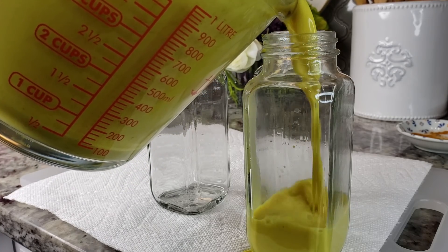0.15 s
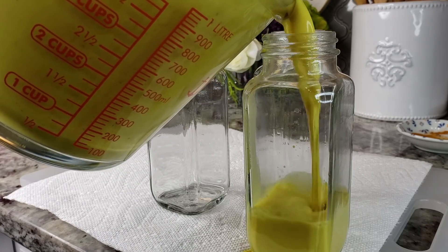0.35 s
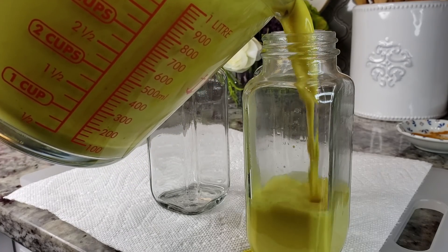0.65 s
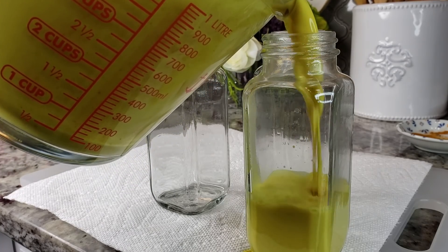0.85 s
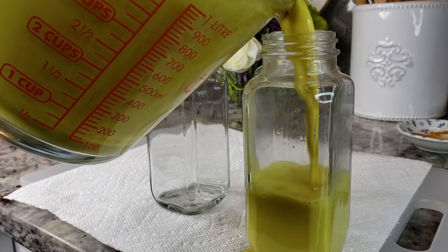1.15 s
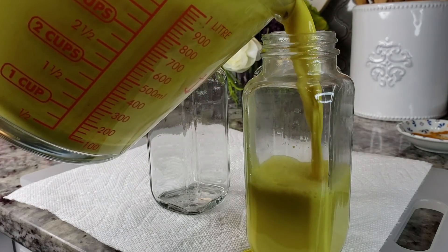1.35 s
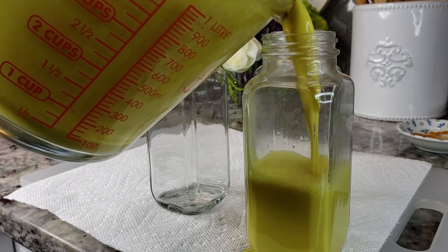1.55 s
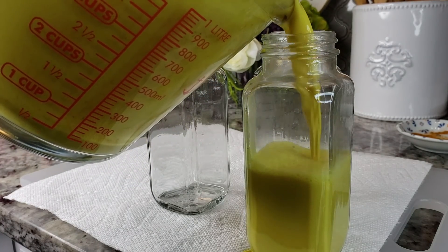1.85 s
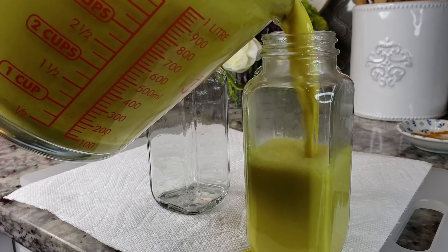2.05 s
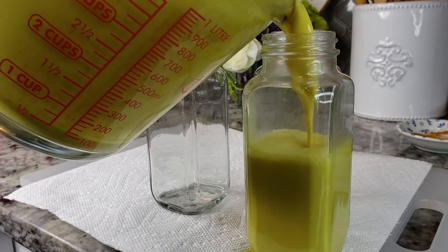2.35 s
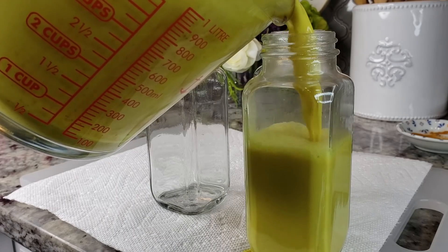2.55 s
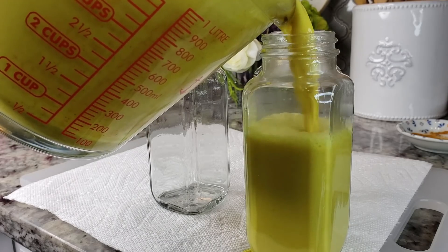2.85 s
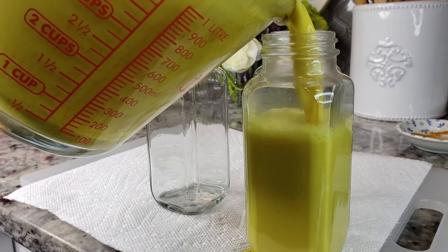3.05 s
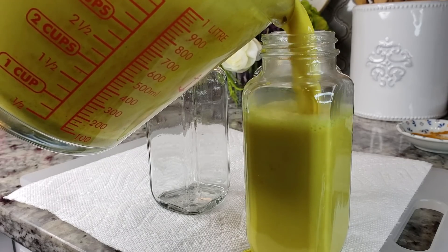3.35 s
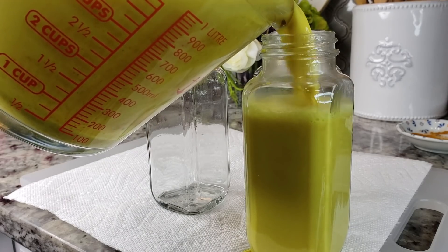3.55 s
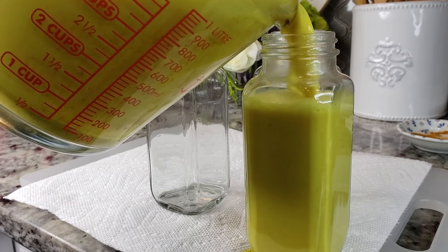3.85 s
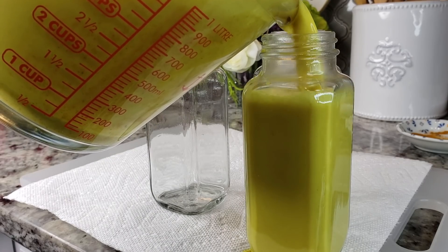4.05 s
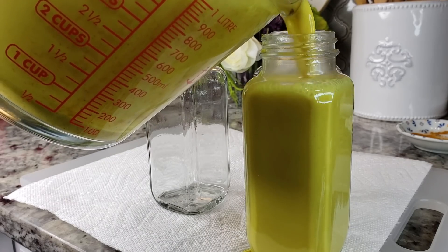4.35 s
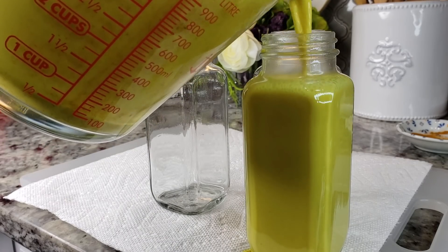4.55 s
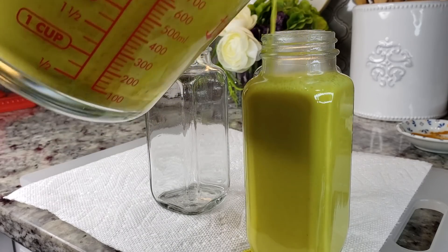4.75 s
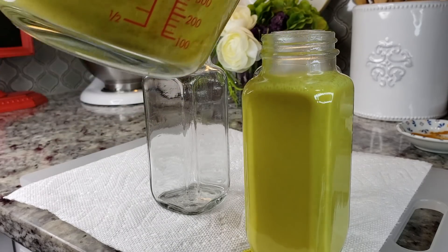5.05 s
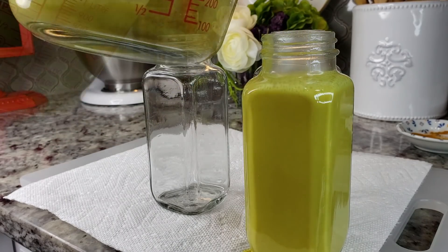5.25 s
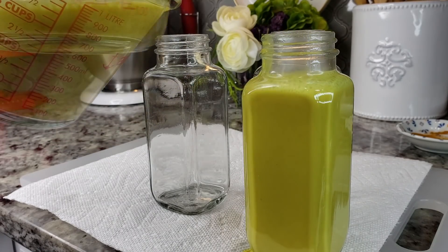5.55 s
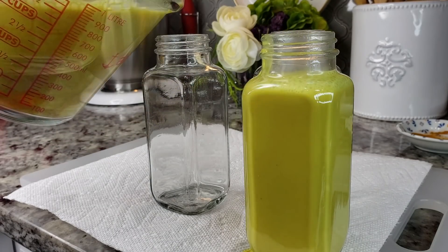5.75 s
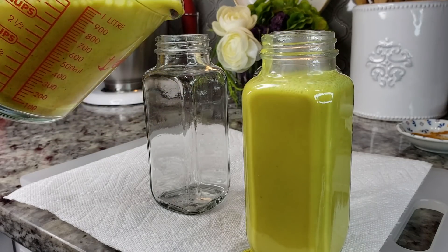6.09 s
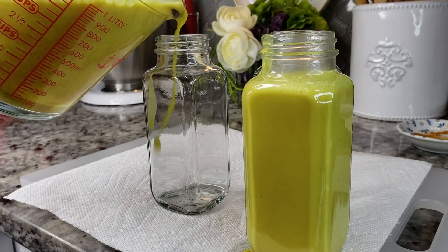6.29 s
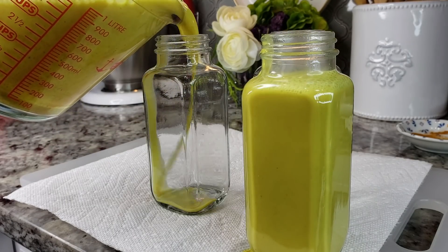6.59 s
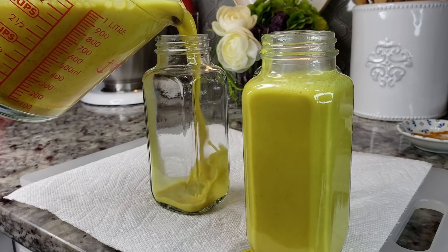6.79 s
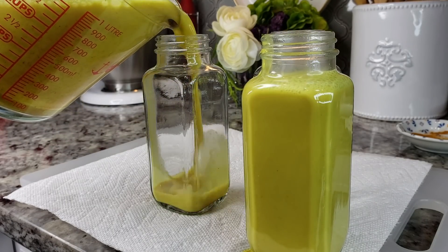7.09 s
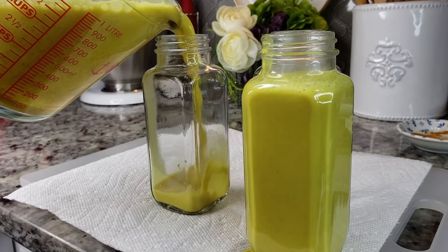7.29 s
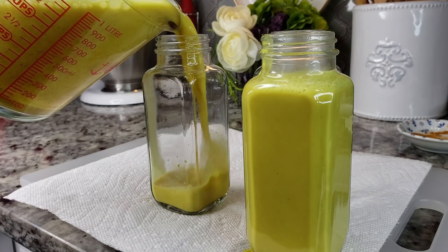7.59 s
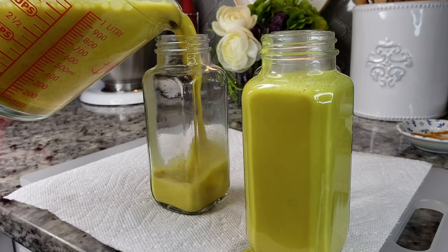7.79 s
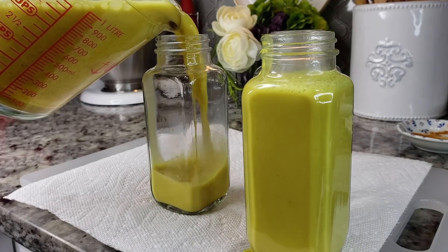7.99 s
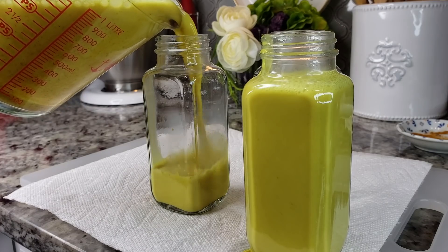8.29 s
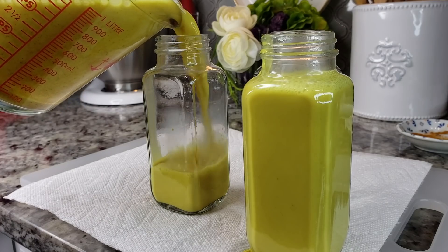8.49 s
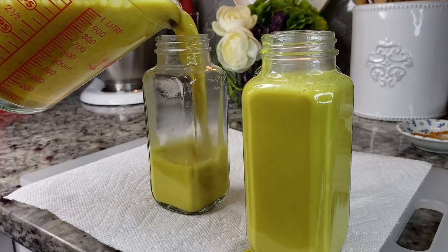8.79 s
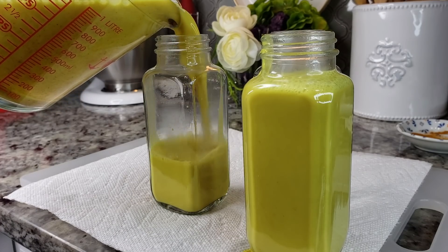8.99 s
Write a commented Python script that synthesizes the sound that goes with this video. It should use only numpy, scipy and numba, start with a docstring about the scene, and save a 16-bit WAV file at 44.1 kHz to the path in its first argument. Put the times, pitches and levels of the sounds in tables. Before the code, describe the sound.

Close kitchen pour: gulping, bubbling liquid rises in tone to the bottle's neck, pauses, then drops ring empty glass and glugging resumes.

```python
"""Over a low kitchen hum, thick juice is poured from a glass jug into a glass bottle until it is nearly full.
Air trapped by the stream gulps and rings the air left in the bottle, whose pitch mostly climbs meanwhile.
Drops crack and bubbles chirp; a wet wash wells into the neck, the pour stops and foam hisses away.
Then drops slap and ring a second, empty bottle, and the stream starts to fill it, gulping again.
Every sound is made from shaped noise, moving resonances and short gliding tones."""
import sys
import numpy as np
from scipy import signal
from scipy.fft import rfft, irfft, next_fast_len
from scipy.io import wavfile
from scipy.ndimage import uniform_filter1d
from numba import njit

SR = 44100
rng = np.random.default_rng(int(sys.argv[2]) if len(sys.argv) > 2 else 0)


def wav_out(sig):
    """Save sig, one row per channel (or a flat mono array), as 16-bit PCM at SR to the path in sys.argv[1]."""
    wavfile.write(sys.argv[1], SR, np.round(np.clip(np.atleast_2d(sig).T, -1, 1) * 32767).astype(np.int16))


N = 402633
TIME = np.arange(N) / SR  # seconds
SWAP_S = 6  # from here on the second bottle is used
COVERED_FILL = 0.074  # effective fill at which the bottle's floor is covered
OPPOSITE = np.array([[1], [-1]])  # left and right with opposite signs


def undb(db):
    """Turn decibels into a gain."""
    return 10 ** (np.asarray(db) / 20)


def unit(x):
    """Scale a sound to an rms of 1."""
    return x / np.sqrt(np.mean(x ** 2) + 1e-30)


def steady(x, count=11025):
    """Even out the slow level over count samples and keep the fine grain."""
    power = np.abs(uniform_filter1d(x ** 2, count))
    return x / np.sqrt(power + 1e-12)


def add(out, s, x):
    """Mix a short sound in at time s."""
    i = max(int(s * SR), 0)
    out[..., i:i + x.shape[-1]] += x[..., :N - i]


def colour(x, points):
    """Filter by a curve of (Hz, dB) points."""
    hz, db = np.transpose(points)
    size = next_fast_len(N)
    f = np.maximum(np.fft.rfftfreq(size, 1 / SR), 1)
    gain = undb(np.interp(np.log(f), np.log(hz), db))
    return irfft(rfft(x, size) * gain, size)[..., :N]


def high_pass(x, hz, order):
    """Keep what lies above a frequency."""
    return signal.sosfilt(signal.butter(order, hz, "high", fs=SR, output="sos"), x)


def low_pass(x, hz):
    """Gently dull what lies above a frequency."""
    return signal.sosfilt(signal.butter(1, hz, fs=SR, output="sos"), x)


def walk(rate):
    """Wander at random, with rate new values a second and an rms of 1."""
    return unit(np.interp(TIME * rate, np.arange(2048), rng.standard_normal(2048)))


@njit
def resonate(x, hz, q):
    """Band-pass filter whose centre may move every sample; a higher q rings longer."""
    y, band, low = np.empty(len(x)), 0., 0.
    for i in range(len(x)):
        g = np.tan(np.pi * min(hz[i] / SR, .45))
        v = (band + g * (x[i] - low)) / (1 + g * (g + 1 / q))
        band = 2 * v - band
        low = low + 2 * g * v
        y[i] = v / q
    return y


def resonate_twice(x, hz, first_q, second_q):
    """Two band-passes in a row give steeper sides."""
    return resonate(resonate(x, hz, float(first_q)), hz, float(second_q))


def patter(rate, spread_db, decay_s):
    """Random small impacts of uneven size, rate a second, each a quickly dying burst of noise."""
    size_db = spread_db * np.minimum(rng.standard_normal(N), 2)
    hits = (rng.random(N) < rate / SR) * undb(size_db)
    energy = signal.lfilter([1], [1, -np.exp(-2 / (decay_s * SR))], hits ** 2 + 1e-12)
    return np.sqrt(energy) * rng.standard_normal(N)


def bubbles(centre_hz, count, octaves, cycles, rise, spread_db):
    """Bubbles of scattered sizes ring for a few cycles and glide up a little as they near the surface."""
    out, t = np.zeros(N), np.arange(1024) / SR
    for (when, size), loud in zip(rng.random((count, 2)), rng.standard_normal(count)):
        hz = centre_hz[int(when * N)] * 2 ** (octaves * (size - .5))
        age = t * hz / cycles
        envelope = undb(spread_db * min(loud, 2)) * (np.exp(-age) - np.exp(-4 * age))
        glide = 1 + rise * (1 - np.exp(-age / 2))
        add(out, when * N / SR, envelope * np.sin(2 * np.pi * hz * t * glide))
    return steady(out)


def by_chance(gain, db, count, spread_db=6):
    """Loosely spaced small events that follow a level: rows (s, peak dB, a random share 0-1)."""
    when, size, share = rng.random((count, 3)).T
    s = (np.arange(count) + when) / count * TIME[-1]
    level_db = 20 * np.log10(np.interp(s, TIME, gain) + 1e-9)
    peak_db = level_db + db + spread_db * (2 * size - 1)
    return np.transpose([s, peak_db, share])


def per_bottle(first, second):
    """Follow one (s, value) curve for the first bottle, then another for the second."""
    first_curve = np.interp(TIME, *np.transpose(first))
    second_curve = np.interp(TIME, *np.transpose(second))
    return np.where(TIME < SWAP_S, first_curve, second_curve)


def kitchen(side_db=-16, wide_hz=800, left_db=1.5):
    """Low rumble and the wavering hum of an appliance; the faint hiss is the widest part."""
    # colour of the room's air: pitch_hz [Hz], relative level_db [dB]
    air_colour = [(15, -48), (25, -9), (108, -2.5), (153, -16.5), (170, -14), (285, -5.5), (317, -10.5),
                  (354, -4.5), (394, -12.5), (476, -10.5), (1230, -36.5), (1370, -34), (2050, -36.5),
                  (9320, -40.5), (16000, -37)]
    # hum tones: pitch_hz [Hz], level_db [dB] before the swell and balance
    hum_tones = [(80.7, -73), (118, -76.5), (145.3, -71), (242.2, -72.5), (290.7, -75), (350.5, -69.5),
                 (1324, -100)]
    # the whole background swells and sinks a little: time_s [s], level_db [dB]
    swell = [(0, 2), (4.3, 0.5), (4.7, 0.5), (5.4, -0.7), (5.6, -2.5), (5.85, -2), (6.05, 0.5), (6.7, -0.5),
             (7.3, 0), (8, 1.4)]
    mid, side = rng.standard_normal((2, N))
    side = undb(side_db) * side + 0.98 * high_pass(side, wide_hz, order=1)
    air = undb(-62) * unit(colour(mid + OPPOSITE * side, air_colour))
    hum = np.zeros(N)
    for hz, db in hum_tones:
        angle = 2 * np.pi * hz * TIME
        hum += undb(db) * (walk(11) * np.sin(angle) + walk(10) * np.cos(angle))
    level = undb(np.interp(TIME, *np.transpose(swell)))
    return (air + hum) * level * undb(left_db * OPPOSITE / 2)


def reflections(x, near_db=0.0, near_s=0.0091, room_db=-15, low_t60=0.96, high_t60=0.59,
                split_hz=3000, wall_db=-9, wall_s=0.0099):
    """Jug, bottles and counter scatter the sound at once; the kitchen adds a tail that dulls as it fades."""
    t = np.arange(32768) / SR
    near, room = rng.standard_normal((2, 2, len(t)))
    # left and right share the low part of the near reflections
    apart = high_pass(near[1], 1100, order=2)
    near = (near[0] + apart * OPPOSITE) * np.exp(-t / near_s)
    near = high_pass(near, 800, order=2)
    # low and high parts of the tail take their own time to fall by 60 dB
    low = low_pass(room, split_hz)
    tail = low * undb(-60 * t / low_t60) + (room - low) * undb(-60 * t / high_t60)
    room = low_pass(tail * (1 - np.exp(-t / 0.023)), 9000)
    response = (undb(near_db) * unit(near) + undb(room_db) * unit(room)) / np.sqrt(len(t))
    # an echo from the side reaches left and right in opposite phase
    echo = np.interp(TIME - wall_s, TIME, low_pass(x, split_hz), left=0)
    return signal.oaconvolve(x[None], response, axes=1)[:, :N] + undb(wall_db) * echo * OPPOSITE


def settling_foam(hz=7400, db=-80):
    """The head of foam on the full bottle hisses softly, as a patter of fine pops, and dies away."""
    pops = patter(rate=850, spread_db=3, decay_s=0.0024)
    hiss = resonate_twice(pops, np.full(N, float(hz)), 4, 4)
    return undb(db) * unit(hiss) * np.interp(TIME, [4.2, 4.7, 5.2, 6.2], [0, 1, .7, 0])


def glass_modes(weight):
    """One ring of the bottle's glass, each mode weighted by a function of its frequency."""
    # ring of the nearly empty bottle: pitch_hz [Hz], time to fall by 60 dB t60_s [s], relative level_db [dB]
    modes = [(3404, 0.3, 2), (4177, .4, -13), (4414, 0.24, -4), (4980, 0.18, -12), (5600, .27, -6),
             (5690, 0.18, -8), (6210, 0.19, -1), (7150, 0.13, -16)]
    t = np.arange(22050) / SR
    return sum(weight(hz) * undb(db - 60 * t / t60) * np.sin(2 * np.pi * hz * t) for hz, t60, db in modes)


def bottle_ring(cracks):
    """The second bottle's glass rings on after each sound, fading away as juice fills it."""
    bare = np.interp(TIME, [6, 6.5, 7.45, 8.3], [0, 1, 1, 0])
    return undb(-66) * signal.oaconvolve(cracks * bare, glass_modes(np.ones_like))[:N]


def glass_hits(octaves=.4):
    """A drop that lands on the glass rings some of its modes, depending on where it strikes."""
    # drops on the glass: start_s [s], relative level_db [dB], centre_hz of the modes they excite [Hz]
    strikes = [(6.816, -47, 5930), (6.912, -69, 6060), (7.095, -68, 7000), (7.231, -47.5, 4270),
               (7.307, -53, 5960), (7.403, -44, 3970)]
    out = np.zeros(N)
    for s, db, centre_hz in strikes:
        ring = glass_modes(lambda hz: np.exp(-(np.log2(hz / centre_hz) / octaves) ** 2))
        add(out, s, undb(db) * ring)
    return out


def shoulder(x, q=6):
    """The fixed resonances of the bottle's top colour every splash."""
    # neck and shoulder resonances: pitch_hz [Hz], relative level_db [dB]
    top_modes = [(950, -16), (1800, -14.5), (2500, -26)]
    return sum(undb(db) * resonate(x, np.full(N, float(hz)), float(q)) for hz, db in top_modes)


def welling(neck_q=4.5, froth_q=2.6, froth_db=0, fine_db=-7):
    """Juice wells up into the neck: a dense wet wash, whose low ring gives way to froth as the stream thins."""
    # the wash in the neck: time_s [s], relative level_db [dB], ring_hz [Hz]
    wash_points = [(3.9, -103, 1250), (3.98, -71, 1300), (4.07, -76, 1450), (4.11, -63, 1490),
                   (4.19, -66, 1580), (4.27, -77, 1570), (4.32, -65, 1610), (4.41, -72, 1700),
                   (4.47, -63, 1760), (4.6, -77.5, 1840), (4.69, -79, 1890), (4.75, -84, 1890),
                   (4.83, -80, 1819), (4.95, -101, 1893)]
    thinning_s, froth_start_hz, froth_rise = 4.56, 2600, 1.9  # rise in octaves per second
    when, db, hz = np.transpose(wash_points)
    ring_hz = np.interp(TIME, when, hz)
    froth_hz = froth_start_hz * 2 ** (froth_rise * np.clip(TIME - thinning_s, 0, .5))
    churn = patter(rate=140, spread_db=4, decay_s=0.003)

    def band(centre_hz, q):
        """The churn heard through one moving resonance."""
        return steady(resonate_twice(churn, centre_hz, q, q))

    thin = np.clip((TIME - thinning_s) / 0.079 + .5, 0, 1)
    # the spray is held back while juice plugs the foot of the neck
    spraying = np.interp(TIME, [4.18, 4.27, 4.45, 4.55], [1, 0.22, 0.14, 0.51])
    wash = (1 - 0.66 * thin) * band(ring_hz, neck_q)
    wash += undb(froth_db) * thin * band(froth_hz, froth_q)
    wash += undb(fine_db) * spraying * band(froth_hz, 2.6)
    return undb(np.interp(TIME, when, db, left=-200, right=-200)) * wash


def chirps(decay_s=.0035, attack_s=.0015, rise=.05):
    """A small bubble closes and rings briefly, gliding up as it nears the surface."""
    # small bubbles: start_s [s], peak level_db [dB] before panning, pitch_hz they glide around [Hz]
    small_bubbles = [(0.464, -43, 2120), (.576, -42.5, 2260), (1.637, -51, 4580), (1.938, -52, 3090),
                     (2.092, -59, 3350), (2.148, -55, 3420), (2.2021, -49.5, 3680), (2.325, -52.5, 3650),
                     (2.3727, -47, 3610), (2.417, -48.5, 3690), (2.5275, -49.5, 3670), (2.56, -57, 3710),
                     (2.6336, -48, 3530), (2.68, -66, 3700), (2.7417, -49.5, 3750), (2.7753, -51, 4500),
                     (2.8466, -52.5, 3710), (3.0194, -52.5, 3740), (3.051, -58, 4130), (3.1465, -58, 3770),
                     (3.4568, -56.5, 4580), (4.821, -70, 4050)]
    out, t = np.zeros(N), np.arange(2048) / SR
    envelope = (1 - np.exp(-t / attack_s)) * np.exp(-t / decay_s)
    for s, db, hz in small_bubbles:
        phase = 2 * np.pi * hz * t * (1 + rise * (np.tanh(t / decay_s / 2) - .5))
        add(out, s, undb(db) * envelope / envelope.max() * np.sin(phase))
    return out


def drops(fill, wave_hz, spray_gain, q=7.8, ping=0.98, rise=0.068, lowest_hz=4000, highest_hz=15000):
    """A drop slaps or a bubble bursts: a crack, brief ping and wet tail, which also ring the bottle and its air."""
    # loud drops and bursting bubbles: start_s [s], level_db [dB] before mixing, pitch_hz [Hz], decay_s [s]
    loud_drops = [(.1015, -34.5, 11870, .004), (.1461, -38, 7860, 0.0034), (.406, -28.5, 4400, 0.0022),
                  (.513, -38, 4650, 0.0023), (.549, -34, 11300, .003), (.5885, -34.5, 12300, .004),
                  (.663, -42, 4830, 0.0022), (.6752, -32, 14500, 0.0062), (.7402, -23.5, 14900, .003),
                  (.775, -33, 13000, 0.0027), (.8805, -34.5, 11400, 0.0026), (.952, -30, 14700, 0.0027),
                  (1.161, -43, 10600, .003), (1.2291, -27.5, 15000, 0.0023), (1.3384, -24, 14250, 0.0029),
                  (1.503, -43, 6660, 0.0027), (1.7399, -36, 11100, 0.0016), (1.8208, -40.5, 7740, .003),
                  (2.039, -43, 15000, .003), (3.2391, -35.5, 13060, .002), (3.3516, -43.5, 15200, .003),
                  (3.398, -46.5, 13450, .003), (3.6325, -47, 12000, 0.0033), (6.6593, -57.5, 6370, 0.0052),
                  (6.815, -31, 7620, 0.0069), (6.816, -43, 5400, 0.0064), (6.843, -35, 13800, 0.0017),
                  (6.872, -52, 7000, .004), (6.9118, -34.5, 11400, 0.0031), (6.9558, -35.5, 13000, 0.0022),
                  (7.008, -52, 6900, 0.0055), (7.029, -46, 9300, 0.0033), (7.031, -50, 4530, 0.0033),
                  (7.0405, -32, 14000, 0.0017), (7.0536, -38.5, 10200, 0.004),
                  (7.0925, -26.5, 13300, 0.0037), (7.0945, -28, 7790, 0.0053), (7.1, -42, 7100, .002),
                  (7.152, -28, 12400, 0.0016), (7.205, -46, 4200, .005), (7.217, -43, 7650, 0.0035),
                  (7.23, -29.5, 4410, 0.0057), (7.294, -44, 7500, 0.0036), (7.3063, -29, 7570, 0.0015),
                  (7.3298, -36.5, 8100, 0.0037), (7.4021, -21, 3290, 0.0023), (7.404, -27.5, 5100, 0.0025),
                  (7.405, -36, 13100, 0.0037), (7.446, -37.5, 7300, 0.0041), (7.5254, -36, 7820, 0.0042),
                  (7.794, -29, 13100, .003), (7.8158, -32.5, 4750, 0.0065), (7.872, -32, 10760, 0.0044),
                  (7.936, -35, 13300, 0.0033), (8.1928, -33, 14300, 0.0027), (8.27, -45, 13100, .003),
                  (8.5604, -31.5, 6900, 0.0027), (8.563, -30, 13500, 0.0041), (8.787, -37.5, 13200, 0.0027),
                  (8.8952, -34.5, 5030, 0.0056)]
    small_db, small_decay_s = 19, 0.0019  # lesser drops come at random, around this far over the spatter's gain
    out, cracks, t = np.zeros(N), np.zeros(N), np.arange(4096) / SR
    click = np.exp(-t / .0008)
    small = [(s, db, lowest_hz + share * (highest_hz - lowest_hz), small_decay_s)
             for s, db, share in by_chance(spray_gain, small_db, count=60)]
    for s, db, hz, decay_s in list(loud_drops) + small:
        # a slap on bare glass starts more slowly and clicks less than a drop into juice
        on_glass = np.interp(s, TIME, fill) < COVERED_FILL
        attack_s, snap = (0.00042, 0.53) if on_glass else (0.00014, 2.9)
        envelope = (1 - np.exp(-t / attack_s)) * (np.exp(-t / decay_s) + snap * click)
        # droplets scatter after each hit, in short steps of random loudness
        scatter = np.repeat(rng.exponential(size=32), 128)
        droplets = undb(-20) * np.exp(-t / 0.027) * scatter
        crack = (envelope + droplets) * rng.standard_normal(len(t))
        glide = 1 + rise * (np.tanh(t / decay_s) - 1)
        bubble = envelope * np.sin(2 * np.pi * hz * t * glide)
        # the smallest bubbles mostly tick
        tonal = np.interp(hz, [8000, 12000], [1, .25])
        sound = unit(resonate(crack, np.full(len(t), float(hz)), q * np.sqrt(tonal)))
        sound += ping * tonal * unit(bubble)
        sound += 0.67 * unit(np.diff(crack, prepend=0))  # the difference brightens the crack
        add(out, s, undb(db) * sound / np.abs(sound).max())
        add(cracks, s, undb(db) * crack)
    out = undb(1.5) * high_pass(out, 3100, order=5)
    return out + bottle_ring(out) + undb(-18.5) * resonate(cracks, wave_hz, 14.0)


def gulps(neck_hz, wave_hz, neck_gain, rise=0.017, jug_hz=360):
    """A pocket of air closes: a short tone and a splash that rings the bottle's air."""
    # big gulps of air: start_s [s], tone level_db [dB] before mixing, pitch_hz it glides up to [Hz],
    # decay_s [s], splash_db relative to the tone [dB] before mixing;
    # mostly near the neck resonance, but near the standing wave while the second bottle's pool is shallow
    big_gulps = [(.003, -39, 507, .012, 7), (.072, -35.5, 539, 0.0044, -10), (.115, -32.5, 583, 0.0035, -7),
                 (.62, -40, 523, .008, -2), (.282, -25, 654, 0.0025, 6), (.3, -28, 600, 0.0032, -9),
                 (.33, -30, 655, 0.0068, -16), (.433, -29, 541, 0.0045, 1), (.523, -26.5, 552, 0.0036, 0),
                 (.529, -22.5, 587, 0.0085, -2.5), (.559, -28.5, 555, 0.007, 3),
                 (.677, -31, 564, 0.021, -30), (.734, -24.5, 542, 0.0067, -28),
                 (.774, -26.5, 484, 0.0025, -2), (.954, -28, 568, 0.0074, 9), (1.009, -26, 556, 0.0029, 5),
                 (1.084, -31.5, 578.6, 0.0067, 13.5), (1.219, -47.5, 620, 0.0035, 26.5),
                 (1.412, -26.5, 579, 0.005, 9), (1.785, -31.5, 720, 0.0013, 0),
                 (1.857, -30.5, 740, 0.0028, 2), (2.018, -36, 730, 0.0019, -18),
                 (2.151, -36.5, 740, 0.0041, -4), (2.677, -37.5, 764, 0.0049, 2),
                 (3.05, -56, 940, 0.002, 9), (3.14, -42, 930, 0.0013, -1), (3.238, -36, 950, 0.0026, 7),
                 (3.312, -54, 980, .003, 11), (3.352, -50.5, 980, 0.0028, 15.5),
                 (3.49, -57.5, 1060, 0.0025, 5), (3.545, -50.5, 1000, 0.0041, 12),
                 (3.7, -55, 1150, 0.0032, 5), (3.897, -56, 1430, 0.0016, -8),
                 (3.399, -48.5, 795, 0.0041, 17), (3.632, -41.5, 1030, 0.013, 13),
                 (3.756, -46.5, 1100, 0.0057, -6), (3.967, -42.5, 1180, 0.0031, 1),
                 (4.094, -36.5, 1580, 0.00064, -10), (4.13, -44, 1740, 0.0016, 3),
                 (4.163, -45, 1510, 0.0036, 10), (4.186, -48, 1800, 0.0025, -3),
                 (4.301, -32.5, 1506, 0.0032, -27), (4.35, -41, 1760, 0.003, -10),
                 (4.433, -52, 1780, 0.0033, -10), (4.49, -47, 1740, 0.0033, -8),
                 (4.453, -41.5, 1650, 0.0058, -17), (4.537, -47, 1910, 0.0058, -11),
                 (4.585, -44, 1830, 0.0052, -14), (4.587, -50, 2750, .003, -9),
                 (4.638, -46.5, 2800, 0.0029, -6), (4.69, -51, 2850, 0.0028, 8),
                 (7.063, -47, 1903, 0.013, -9), (7.18, -55, 1810, 0.026, -20),
                 (7.231, -38, 1825, 0.04, -19), (7.28, -48, 1920, 0.017, -20),
                 (7.352, -36.5, 1872, 0.034, -20), (7.58, -51.5, 1000, 0.0055, -5),
                 (7.636, -39, 964, 0.0061, 17), (7.655, -49, 485, 0.033, -15), (7.755, -42, 940, 0.0063, 9),
                 (7.895, -43, 685, .004, -5), (7.938, -40, 680, .004, 4), (7.99, -29, 547, 0.0027, -19),
                 (8.073, -33, 510, 0.0065, -17), (8.095, -30, 593, .005, -12),
                 (8.131, -31.5, 496, 0.0075, 2), (8.15, -37, 509, 0.012, -19),
                 (8.274, -35, 550, 0.0047, -14), (8.365, -37, 686, 0.008, -9), (8.45, -32, 492, 0.0053, -9),
                 (8.665, -31, 578, 0.0086, -8), (8.893, -39, 564, 0.027, -18),
                 (9.093, -43.5, 587, 0.01, -18), (9.1, -34.5, 434, 0.0092, -17),
                 (8.218, -37, 733, 0.011, -14), (8.315, -29, 524, 0.012, -29.5),
                 (8.414, -25, 564, 0.0059, 1.5), (8.562, -27.5, 568, 0.0042, -31),
                 (8.728, -24, 590, 0.0055, -52), (8.762, -26.5, 578, 0.0031, -33),
                 (8.812, -29, 526, 0.0026, -12), (9.028, -31, 487, 0.0066, -35)]
    # lesser gulps come at random, around this far over the neck tone's gain
    small_db, small_decay_s, small_splash_db = 13.5, 0.0084, -18
    lowest, highest = .85, 1.3  # their pitch relative to the neck resonance
    swell_cycles = 1.5
    tones, splashes, slosh = np.zeros((3, N))
    t = np.arange(4096) / SR
    small = [(s, db, np.interp(s, TIME, neck_hz) * (lowest + share * (highest - lowest)),
              small_decay_s, small_splash_db)
             for s, db, share in by_chance(neck_gain, small_db, count=70)]
    for s, db, hz, decay_s, splash_db in list(big_gulps) + small:
        envelope = (1 - np.exp(-(t * hz / swell_cycles) ** 2)) * np.exp(-t / decay_s)
        phase = 2 * np.pi * hz * t * (1 + rise * (np.tanh(t / decay_s / 2) - 1))
        burst = np.exp(-t / 0.019) * rng.standard_normal(len(t))
        add(tones, s - .001, undb(db) * envelope / envelope.max() * np.sin(phase))
        add(splashes, s, undb(db + splash_db) * burst)
        add(slosh, s, undb(db + 1) * np.exp(-t / 0.017) * burst)
    # close under the neck the gulps turn into broad wet plops
    full = np.interp(neck_hz, [750, 1150], [0, 1])
    wet = full * slosh
    plops = resonate(resonate(wet, neck_hz * 1.32, 5.6), neck_hz, 5.3) + .5 * shoulder(wet)
    rings = undb(-3.0) * resonate(tones, neck_hz, 50.0) + undb(-16.5) * resonate(splashes, wave_hz, 26.0)
    # the wide jug above hums along
    jug = resonate(tones + undb(12.0) * splashes, np.full(N, float(jug_hz)), 47.0)
    return undb(-8.0) * (tones + jug) + rings + undb(-2.5) * shoulder(splashes) + undb(3.5) * plops


def stream_levels(fill):
    """Gains of neck tone, standing wave, foam and spatter: all follow the churn and the effective fill."""
    # how hard the stream churns the surface of each bottle: time_s [s], relative level_db [dB]
    first_churn = [(0, -0.5), (.15, -3.5), (.272, -7.5), (.3, 4), (.39, -4.5), (.47, -4), (1.05, -1),
                   (1.4, -2.5), (1.65, -6), (1.95, -3.5), (2.25, -5.5), (2.6, -4.5), (2.95, -7.5),
                   (3.25, -2), (3.85, -9), (4.15, -2), (4.28, -13.5), (4.58, -4), (4.75, -18), (5.05, -19)]
    second_churn = [(6.82, -34), (7.1, -21), (7.25, -4), (7.55, -7), (7.8, 0.5), (8, -3.5), (8.25, 0.5),
                    (8.45, -4.5), (8.7, 2), (9.13, -1)]
    pool_fill, shallow_loss_db = 0.2, 41.5  # a shallower pool traps little air
    shoulder_fill, shoulder_loss_db = 0.703, 68  # above this fill the standing wave dies out
    flowing = (TIME < first_churn[-1][0]) | (TIME > second_churn[0][0])
    churn = flowing * undb(per_bottle(first_churn, second_churn))
    shallow = np.clip(1 - fill / pool_fill, 0, 1)
    covered = np.clip(fill / COVERED_FILL, 0, 1)
    narrowing = np.maximum(fill - shoulder_fill, 0) / (1 - shoulder_fill)
    # each starts from a level at 0 dB of churn and loses some dB as the fill goes from 0 to 1
    neck = churn * undb(-46 - 22.5 * fill - shallow_loss_db * shallow)
    wave = churn * undb(-55 - 3.5 * fill - shoulder_loss_db * narrowing) * covered
    foam = churn * undb(-52 - 13.5 * fill)
    spray = churn * undb(-57 - 22 * fill)
    return neck, wave, foam, spray


def stream(neck_hz, wave_hz, neck, wave, fizz, spray, surge_db=2, wave_q=22, foam_hz=2330, fizz_hz=4400):
    """The stream churns the surface: the air above rings in its modes, with bubbles, splashing and fine spatter."""
    # colour of the coarse splashing: pitch_hz [Hz], relative level_db [dB]
    splash_colour = [(400, -36), (850, -5.5), (1300, -1), (1800, -5.5), (2400, 2), (3100, -19.5),
                     (3900, 5.5), (4900, -5.5), (6500, -6), (10000, -13)]
    # colour of the fine spatter: pitch_hz [Hz], relative level_db [dB]
    spatter_colour = [(300, -61), (900, 0), (1500, -11.5), (3000, -12), (4500, -8.5), (7500, 8),
                      (9400, -1.5), (12000, 6), (15000, 0.5), (17000, 16.5)]

    neck_knocks = patter(rate=105, spread_db=1, decay_s=0.0046)
    neck_tone = steady(resonate_twice(neck_knocks, neck_hz, 22, 1.7))
    gurgle = bubbles(neck_hz * 0.955, count=500, octaves=1.11, cycles=5.5, rise=0.039, spread_db=5.5)
    burble = bubbles(np.full(N, 1250.), count=1500, octaves=1.5, cycles=5, rise=.08, spread_db=4)

    # foam damps and widens the standing wave as the air column gets short
    blur = np.clip((wave_hz - foam_hz) / 700, 0, 1)
    knocks = patter(rate=140, spread_db=3, decay_s=0.003)
    sharp = steady(resonate_twice(knocks, wave_hz, wave_q, 6.4))
    blips = bubbles(wave_hz, count=550, octaves=.3, cycles=10, rise=.04, spread_db=5)
    wide = steady(.8 * blips + .45 * steady(resonate_twice(knocks, wave_hz, 4, 4)))
    # bubbles near the standing wave's pitch are picked out by it, one chirp at a time
    near_pitch = bubbles(wave_hz, count=700, octaves=.28, cycles=10, rise=.04, spread_db=5)
    chirping = steady(resonate(near_pitch, wave_hz, 6.))
    deep = np.interp(neck_hz, [470, 500], [.25, .5])  # share of chirps, more in a deeper pool
    clear_wave = np.sqrt(1 - deep) * sharp + np.sqrt(deep) * chirping
    wave_tone = np.sqrt(1 - blur) * clear_wave + undb(-5) * np.sqrt(blur) * wide
    overtone_knocks = patter(rate=190, spread_db=3.5, decay_s=0.0015)
    overtone = steady(resonate(overtone_knocks, wave_hz * 1.807, 12.0))

    pops = patter(rate=260, spread_db=8.5, decay_s=0.0037)
    foam = steady(resonate_twice(pops, np.full(N, float(fizz_hz)), 1.7, 1.7))
    splashing = steady(colour(patter(rate=70, spread_db=13.0, decay_s=0.0014), splash_colour))
    droplets = bubbles(np.full(N, 5000.), count=1600, octaves=1.3, cycles=14, rise=.02, spread_db=7)
    spatter = steady(colour(patter(rate=90, spread_db=3.0, decay_s=0.0054), spatter_colour))

    # foam damps the overtone first, then the neck tone and droplets, which leaves mostly the gurgle
    tall = np.interp(wave_hz, [2250, 2900], [1, 0])
    clear = np.interp(neck_hz, [740, 860], [1, .15])
    neck_sound = neck * (undb(-0.5) * clear * neck_tone + undb(-12) * gurgle + undb(-20.5) * burble)
    wave_sound = wave * (undb(-2.5) * wave_tone + undb(-8.5) * tall * overtone)
    fizz_sound = fizz * (undb(-12) * foam + undb(-11) * splashing + undb(-11) * clear * droplets)
    surge = undb(surge_db * walk(22))
    return surge * (neck_sound + wave_sound + fizz_sound + undb(11.5) * spray * spatter)


def scene(first_pan_db=0.24, second_pan_db=2.0, shade_db=2):
    """Air in each bottle sets the pitches; the first stands near the middle, the second to the left."""
    # effective fill of each bottle, which sets the neck pitch and the layer levels; it mostly rises
    # but wavers: time_s [s], fill [share 0-1]
    first_fill = [(0, 0.25), (1.4, 0.46), (1.9, 0.585), (2.5, 0.665), (2.85, 0.69), (3.2, 0.79),
                  (3.7, 0.87), (4, 0.9), (4.3, 0.82), (4.6, 0.96)]
    second_fill = [(7.02, 0.018), (7.5, 0.13), (7.92, .12), (7.99, 0.22), (8.3, .2), (8.6, 0.31),
                   (9.13, 0.43)]
    # first standing wave of the shrinking air column in each bottle: time_s [s], pitch_hz [Hz]
    first_wave = [(0, 2022), (1, 2477), (1.5, 2723), (2, 3180), (2.5, 3720), (2.8, 3750), (3.4, 4420)]
    second_wave = [(7.1, 1812), (8, 2035), (9.13, 2510)]
    empty_neck_hz = 441.2  # neck resonance of an empty bottle
    fill = np.clip(per_bottle(first_fill, second_fill), 0, .96)
    # the air left in the bottle is a spring under the plug of air in the neck
    neck_hz = empty_neck_hz / np.sqrt(1 - fill)
    wave_hz = per_bottle(first_wave, second_wave)
    neck, wave, fizz, spray = stream_levels(fill)

    flow = stream(neck_hz, wave_hz, neck, wave, fizz, spray)
    juice = flow + undb(-12.0) * bottle_ring(flow) + welling() + settling_foam()
    pops = gulps(neck_hz, wave_hz, neck) + chirps() + glass_hits()
    splats = drops(fill, wave_hz, spray)

    # the right side is shaded from the bright drops
    second = TIME > SWAP_S
    pan_db = np.where(second, second_pan_db, first_pan_db)
    pan = undb(OPPOSITE / 2 * pan_db)
    shaded = undb(OPPOSITE / 2 * (pan_db + shade_db))
    left, right = (juice + pops) * pan + splats * shaded
    # sound from the left reaches the right side a few samples later
    late = np.where(second, np.roll(right, 7), np.roll(right, 2))
    # each kind of sound starts at its own place in the bottle and scatters differently
    scattered = (reflections(juice) + reflections(pops, near_db=-4.5, near_s=0.014)) * pan
    scattered += reflections(splats, near_db=-1, near_s=0.01) * shaded
    return np.array([left, late]) + scattered + kitchen()


def record(dry):
    """The recorder steeply cuts the treble above 16 kHz."""
    return signal.sosfilt(signal.ellip(10, .2, 70, 16000, fs=SR, output="sos"), dry)


dry = scene()
out = record(dry)
wav_out(out)
```